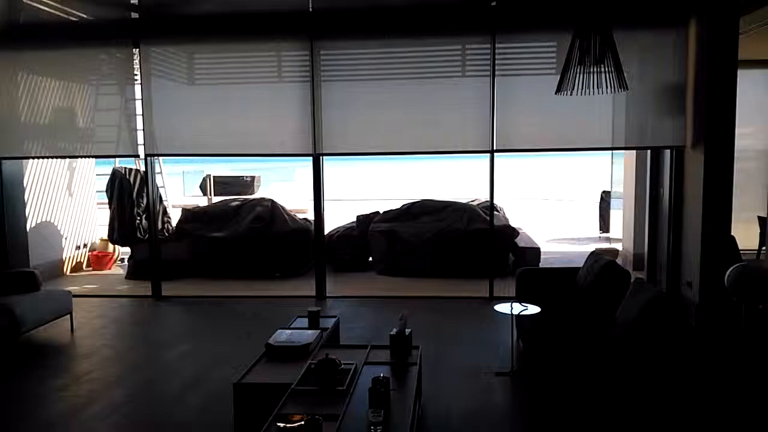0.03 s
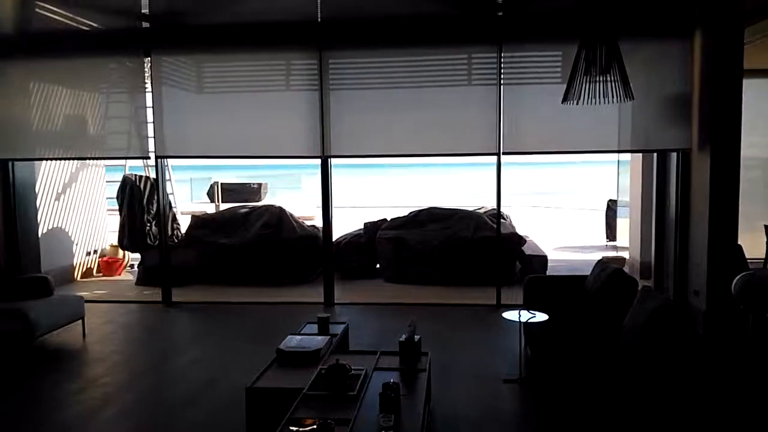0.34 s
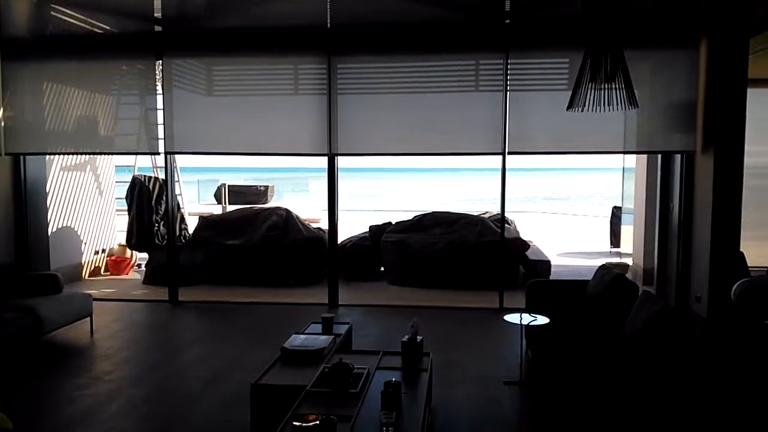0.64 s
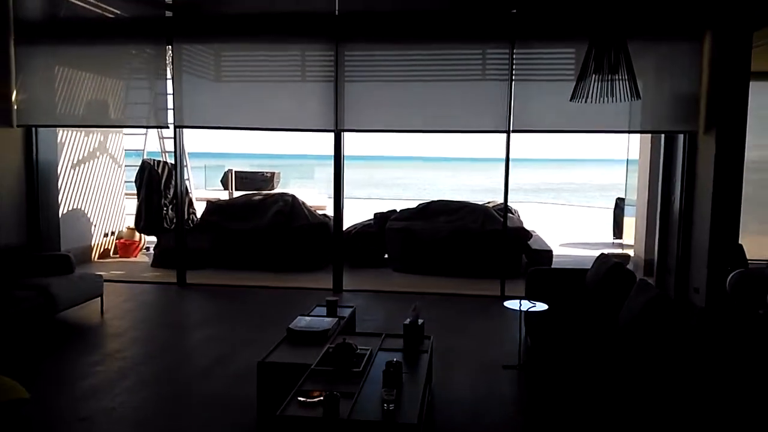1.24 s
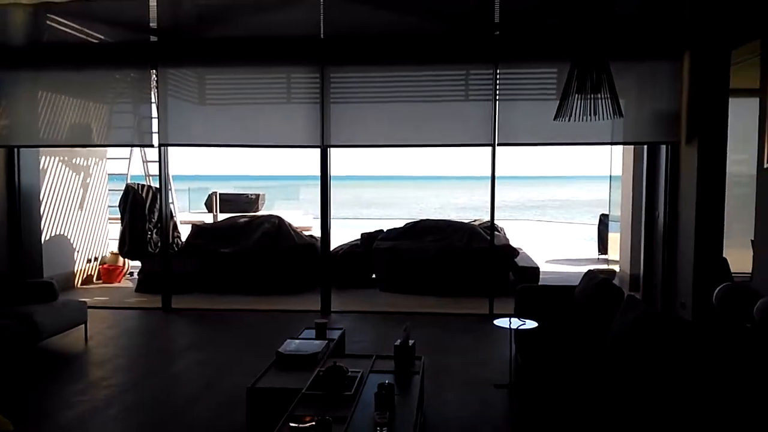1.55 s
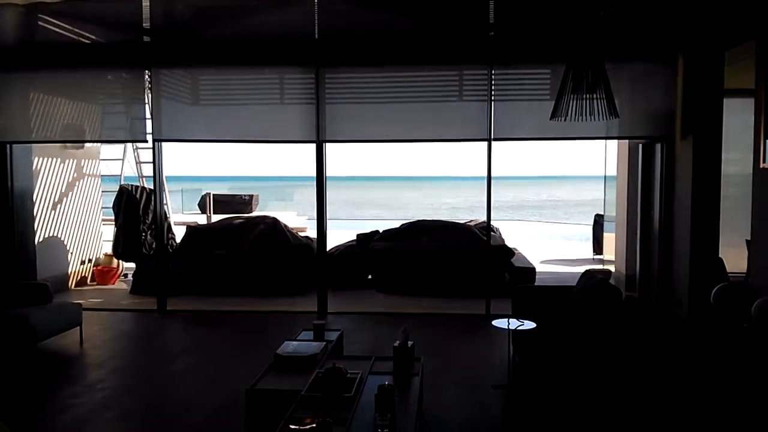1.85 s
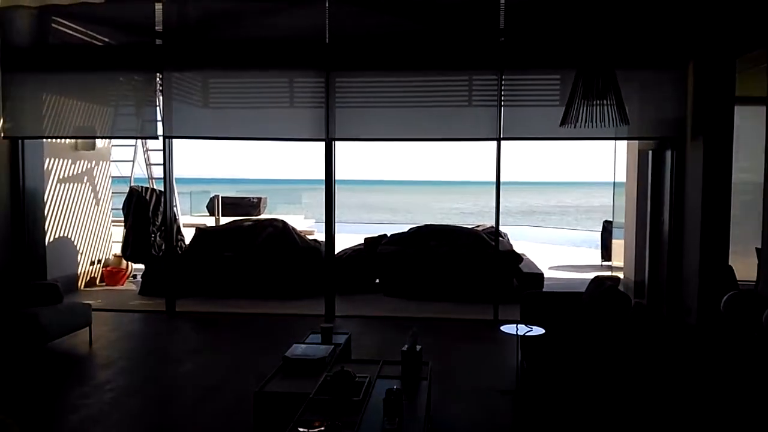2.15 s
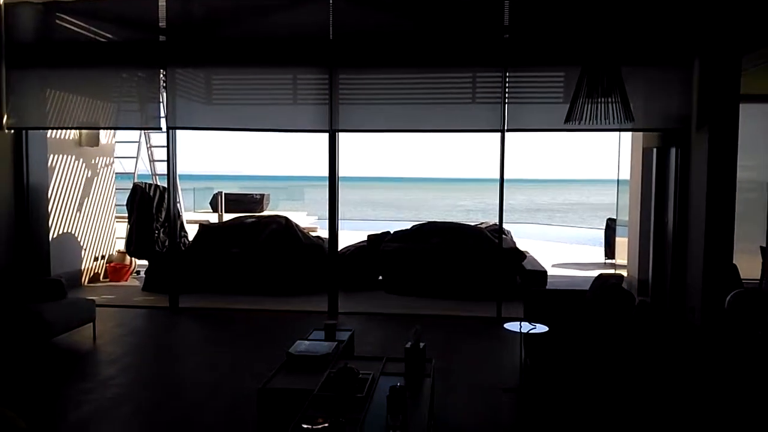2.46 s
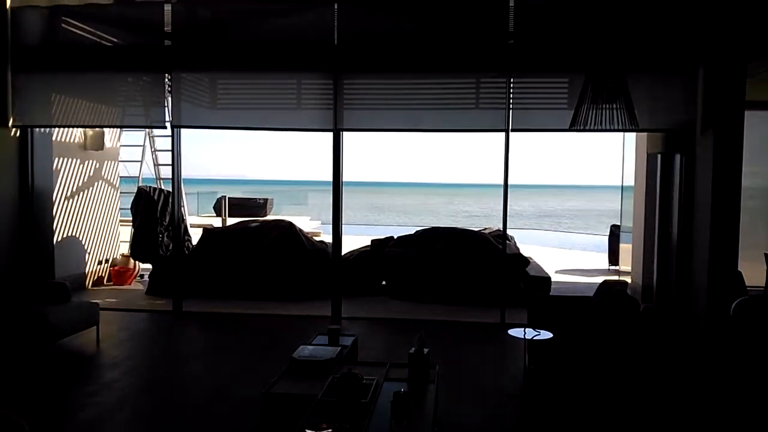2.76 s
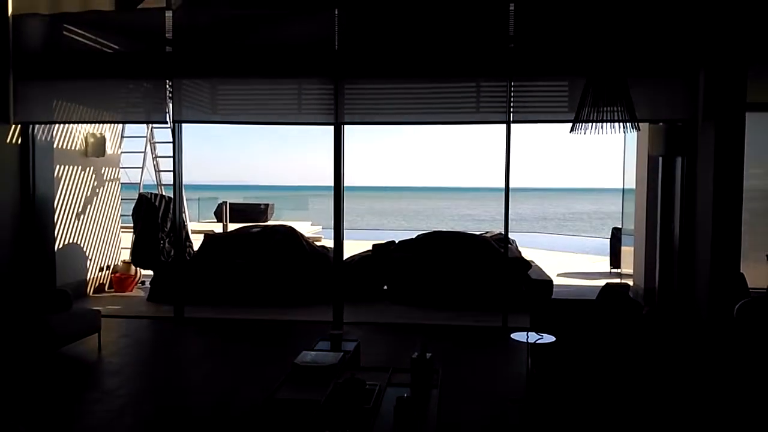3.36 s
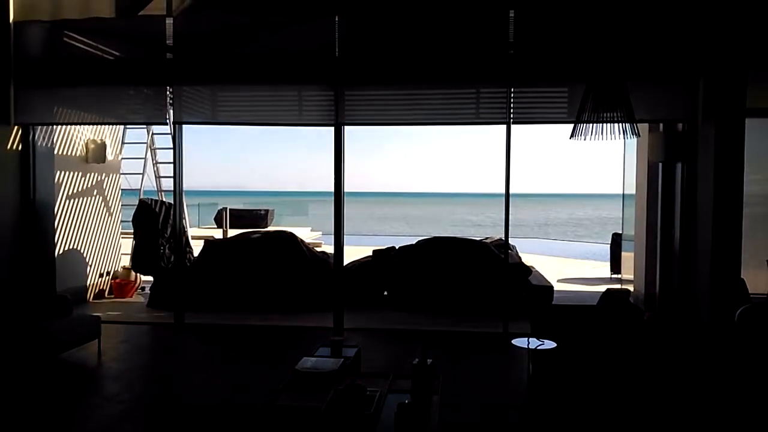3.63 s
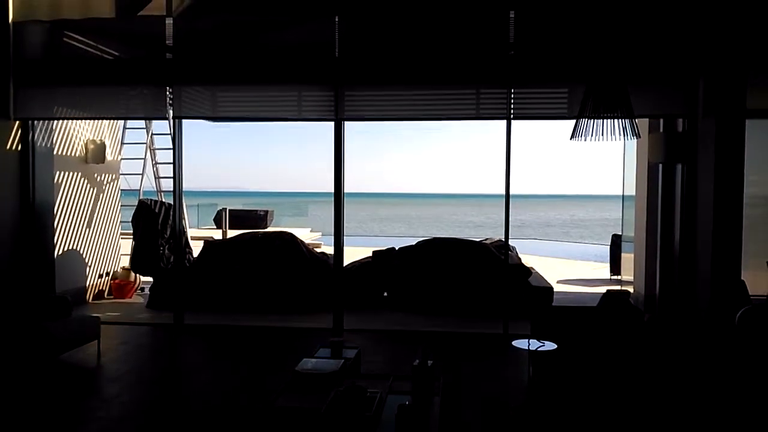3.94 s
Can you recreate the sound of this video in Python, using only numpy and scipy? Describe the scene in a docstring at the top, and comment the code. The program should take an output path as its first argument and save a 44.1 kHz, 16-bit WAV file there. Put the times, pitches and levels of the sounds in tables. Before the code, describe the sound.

Motorized blinds roll up with a low, pulsing hum and a light gear whirr.

```python
"""A quiet room, in which wide roller blinds are heard rising from across the floor.
Three tube motors run at nearly equal speeds, so their hums superpose in slow beats over a low throb.
The turning rollers rumble, the casing rings at its resonances, and the gears whirr and whine,
loudest in about the first second. The fabric rustles faintly and the mechanism ticks once."""
import sys
import numpy as np
from scipy import signal
from scipy.fft import rfft, irfft
from scipy.io import wavfile
from scipy.ndimage import uniform_filter1d

SR = 44100
rng = np.random.default_rng(int(sys.argv[2]) if len(sys.argv) > 2 else 0)


def output_pcm(signal):
    """Save a mono or channel-first signal as 16-bit PCM at the path in sys.argv[1].

    Samples are clipped to [-1, 1] before scaling.
    """
    pcm = np.clip(np.atleast_2d(signal).T, -1, 1) * 32767
    wavfile.write(sys.argv[1], SR, np.round(pcm).astype(np.int16))


N = 176400
T = np.arange(N) / SR

# Levels are relative. A spectrum gives only the shape of a noise; balance is left minus right.
# hums of the three motors (offset from the middle motor f/Hz, level/dB)
MOTOR_HUMS = [(0, -41), (-1.676, -47), (1.73, -60.5)]
# level of the hum, with deep dips where the beats fall nearly silent (t/s, level/dB)
HUM_ENVELOPE = [(.11, -12), (.25, 2.5), (.44, 3), (.6, 0.5), (.69, 0.5), (.8, 1), (1.2, 3), (1.4, -2),
                (1.58, -2), (1.8, -6), (1.88, -22.5), (1.96, 1), (2.1, -5), (2.26, -0.5), (2.55, -2.5),
                (2.85, 0), (3.05, -12), (3.17, -3), (3.3, -2.5), (3.5, 4.5), (3.7, 2.5), (4, 1.5)]
# envelope of the throb and the drive's drone (t/s, level/dB)
THROB_ENVELOPE = [(.11, -11), (.33, 5), (.45, -3.5), (.6, 3), (.85, -1.5), (1.15, 5.5), (1.28, -4),
                  (1.42, 2), (1.78, 0.5), (1.88, -11), (1.98, 4), (2.38, -5.5), (2.55, -2.5), (2.8, 2.5),
                  (3.1, -7), (3.38, 2.5), (3.68, 0), (3.92, 1.5)]
# throb of the motor mounts (f/Hz, level/dB)
THROB_SPECTRUM = [(20, -22), (35, -26.5), (45, 6), (57, 2.5), (70, 4.5), (80, 11.5), (92, 0), (115, -17),
                  (200, -51)]
# envelope of the roller rumble (t/s, level/dB)
RUMBLE_ENVELOPE = [(.12, -66.5), (.23, -56), (.38, -46.5), (.56, -47.5), (.68, -44), (.82, -47.5),
                   (1.08, -45.5), (1.2, -45), (1.45, -59.5), (1.8, -56.5), (2.05, -51.5), (2.3, -50.5),
                   (2.45, -56), (2.8, -52), (3.18, -51.5), (3.5, -46), (3.8, -46), (4, -57)]
# roller rumble (f/Hz, level/dB)
RUMBLE_SPECTRUM = [(40, -49), (85, -27), (112, 5.5), (137, 3), (165, 4), (185, -2.5), (212, -4.5),
                   (250, -11), (330, -28), (700, -83.5)]
# envelope of the casing's drone and ringing (t/s, level/dB)
CASING_ENVELOPE = [(.12, -68.5), (.22, -54.5), (.42, -48), (1.2, -48.5), (1.48, -58.5), (1.75, -58),
                   (2.2, -56), (2.6, -57.5), (3.1, -55), (3.4, -54.5), (3.6, -56.5), (3.85, -53), (4, -53)]
# drone of the casing (f/Hz, level/dB)
CASING_SPECTRUM = [(150, -16.5), (250, 0), (300, -0.5), (340, -3.5), (400, 3), (450, -4.5), (500, -3),
                   (580, -3), (680, -8.5), (800, -10.5), (1100, -26.5), (2000, -60)]
# resonances of the casing (f/Hz, bandwidth/Hz, level/dB, balance/dB)
CASING_MODES = [(200.8, 13.5, -6.5, -4.5), (274.6, 11, -18.5, -2), (301.2, 4.5, -14.5, 1.5),
                (424, 10, -12, 3), (476.4, 8.8, -13.5, -2.5), (522, 6, -18, -1.5), (585.6, 14, -19.5, -1),
                (745, 6.9, -19, 4.5), (808, 8, -28, -4.5)]
# hollow swells of the casing (centre t/s, duration/s, level/dB)
HOLLOW_SWELLS = [(0.435, .14, -54.5), (0.96, 0.51, -58.5), (1.627, 0.089, -62.5), (2.31, 0.13, -62.5),
                 (3.366, 0.13, -57.5), (3.81, 0.29, -58)]
# timbre of those swells (f/Hz, level/dB)
HOLLOW_SPECTRUM = [(200, -27.5), (270, 3.5), (330, -1.5), (395, 8.5), (430, 5), (500, -9), (700, -40)]
# envelope of the gear noise (t/s, level/dB)
GEAR_ENVELOPE = [(.12, -75), (.2, -64), (.38, -56), (1.0, -56), (1.24, -55.5), (1.46, -67), (1.9, -69),
                 (2.05, -68), (2.35, -70.5), (2.86, -67), (3.15, -69), (3.3, -66.5), (4, -65)]
# gear whirr (f/Hz, level/dB)
WHIRR_SPECTRUM = [(100, -16.5), (400, 1.5), (750, -6.5), (950, -1.5), (1350, -2.5), (1650, 1), (2000, -0.5),
                  (2350, 1.5), (2800, -2), (3150, -13), (3900, -16), (4150, -15), (4400, -9), (4750, -18.5),
                  (5500, -23), (6500, -29.5), (9000, -41), (15000, -50.5)]
# gear whines (f/Hz, bandwidth/Hz, level/dB, balance/dB)
GEAR_WHINES = [(1515, 7, -15.5, 6), (1664, 10, -19, 2), (1803, 8, -16, 0), (2181, 8, -19, 6),
               (2385, 14, -21, 4), (2466, 8, -18.5, 9), (2766, 12, -20, 10), (4305, 14, -28, -4)]
# bright rasp heard while the whirr is loud (f/Hz, level/dB)
RASP_SPECTRUM = [(700, -10.5), (1150, 9), (1600, -6), (2700, -6.5), (3200, 0), (3900, -2), (4450, 1),
                 (4900, -1), (5500, -8), (6600, -18.5), (10000, -34.5)]
# rustles of the fabric (onset t/s, duration/s, level/dB)
RUSTLE_EVENTS = [(.41, .08, -84), (.66, .04, -85), (1.41, .07, -83), (2.51, .22, -86), (2.75, .1, -86),
                 (3.77, .05, -83), (3.935, .03, -81)]
# timbre of a rustle (f/Hz, level/dB)
RUSTLE_SPECTRUM = [(1500, -10), (4500, 0), (8000, 0), (11000, -4), (15000, -12)]
# tick of the mechanism (t/s, level/dB)
TICK_EVENTS = [(1.072, -43.5)]
# timbre of the tick (f/Hz, level/dB)
TICK_SPECTRUM = [(500, -16), (1000, -5.5), (1500, 5), (2000, -19), (3000, -18), (8000, -50)]
# likeness of the two microphone signals (f/Hz, correlation before clipping to -1..1)
CORRELATION = [(30, 0.6), (100, 1.6), (200, 1.27), (350, 0.82), (550, 0.72), (850, 0.48), (1300, -0.11),
               (1800, -0.1), (2600, 0.13), (4000, -0.01), (8000, -0.08), (15000, -0.5)]
# level difference between the microphones (f/Hz, balance/dB)
BALANCE = [(30, 2), (150, 3), (450, -1.5), (750, 1), (1200, 0), (1900, 2.5), (2350, 6), (2800, 9.5),
           (3300, -2), (3800, -2), (4400, -2), (5200, -8), (7000, -1), (12000, 0.5)]
# microphone hiss (f/Hz, level/dB)
HISS_SPECTRUM = [(100, 0.5), (3000, -5.5), (7000, 3), (10000, 1.5), (15500, -2.5)]
# thin electrical whistles (f/Hz, level/dB)
WHISTLE_TONES = [(7381, -102), (14729, -102)]


def amp(db):
    """Amplitude ratio: a factor of ten for every 20 dB."""
    return 10 ** (np.asarray(db) / 20)


def unit(x):
    """Normalisation to an rms of 1."""
    return x / np.sqrt(np.mean(abs(x) ** 2) + 1e-30)


def at_hz(points, hz):
    """Interpolation on a logarithmic frequency axis."""
    f, value = np.transpose(points)
    return np.interp(np.log(hz + 1), np.log(f), value)


def envelope(points):
    """Amplitude envelope, piecewise linear in decibels."""
    return amp(np.interp(T, *np.transpose(points)))


def pan(balance_db):
    """Constant-power law for the left and right gains."""
    gains = amp(np.array([balance_db / 2, -balance_db / 2]))
    return (gains / np.sqrt((gains ** 2).sum(0) / 2))[:, None]


def wander(rate_hz):
    """Random modulation: complex noise low-passed at the given rate."""
    f = np.fft.fftfreq(N, 1 / SR)
    real, imag = rng.standard_normal((2, N))
    return unit(np.fft.ifft((real + 1j * imag) / (1 + (f / rate_hz) ** 4)))


def colour(x, spectrum):
    """Filtering by multiplication in the frequency domain, at unit rms."""
    gain = amp(at_hz(spectrum, np.fft.rfftfreq(N, 1 / SR)))
    return unit(irfft(rfft(x) * gain, N))


def stereo_pair(left, independent, hz):
    """Partial coherence: the right microphone shares part of the left one's signal."""
    shared = np.clip(at_hz(CORRELATION, hz), -1, 1)
    return np.array([left, shared * left + np.sqrt(1 - shared ** 2) * independent])


def diffuse_noise(spectrum, patchy_db, frame=2048):
    """Diffuse field: partly coherent noise whose level drifts in patches of time and frequency."""
    hz = np.fft.rfftfreq(frame, 1 / SR)
    a, b, c, d, patches = rng.standard_normal((5, 4 * N // frame + 5, len(hz)))
    patches = uniform_filter1d(patches, size=6, axis=0)
    patches = unit(uniform_filter1d(patches, size=3, axis=1))
    pair = stereo_pair(a + 1j * b, c + 1j * d, hz)
    spectra = pair * amp(at_hz(spectrum, hz) + patchy_db * patches) * pan(at_hz(BALANCE, hz))
    _, noise = signal.istft(spectra.transpose(0, 2, 1), nperseg=frame, noverlap=frame - frame // 4)
    return unit(noise[:, :N])


def ringing(modes):
    """Randomly excited resonances: each is a narrow band that wavers in level and pitch."""
    total = np.zeros((2, N))
    for hz, width_hz, db, balance_db in modes:
        drift = stereo_pair(wander(width_hz / 2), wander(width_hz / 2), hz)
        total += amp(db) * pan(balance_db) * unit((drift * np.exp(2j * np.pi * hz * T)).real)
    return total


def motors(middle_hz=101.33, in_phase_s=0.45, octave_db=-26.5):
    """Beats: three hums of nearly equal frequency alternately reinforce and oppose one another."""
    hum = np.zeros(N, complex)
    for offset_hz, db in MOTOR_HUMS:
        phasor = np.exp(2j * np.pi * (middle_hz + offset_hz) * (T - in_phase_s))
        hum += amp(db) * (phasor + amp(octave_db) * phasor ** 2)
    hum *= 1 + 0.17 * wander(rate_hz=8.1)  # flutter
    return envelope(HUM_ENVELOPE) * np.sqrt(2) * hum.real * pan(balance_db=-1.4)


def drive(drone_hz=74.03):
    """Amplitude modulation: the drive's low drone and the mounts' throb swell and sink together."""
    drone = amp(-54.5) * unit(np.sin(2 * np.pi * drone_hz * T))
    throb = amp(-56) * diffuse_noise(THROB_SPECTRUM, patchy_db=1, frame=8192)
    return envelope(THROB_ENVELOPE) * (drone + throb)


def rollers():
    """Random vibration: the turning tubes radiate an uneven low rumble."""
    rumble = amp(-0.5) * diffuse_noise(RUMBLE_SPECTRUM, patchy_db=1, frame=4096)
    return envelope(RUMBLE_ENVELOPE) * rumble


def casing():
    """Resonance: the housing drones, rings at its natural frequencies and at times swells hollowly."""
    drone = amp(-3.5) * diffuse_noise(CASING_SPECTRUM, patchy_db=2)
    modes = ringing(CASING_MODES)
    swell = sum(amp(db) * np.exp(-2 * ((T - centre) / length) ** 2)
                for centre, length, db in HOLLOW_SWELLS)
    hollow = swell * diffuse_noise(HOLLOW_SPECTRUM, patchy_db=2)
    return envelope(CASING_ENVELOPE) * (drone + modes) + hollow


def gears(rasp_exponent=1.8):
    """Meshing noise: the teeth whirr and whine; the rasp grows as a power of the whirr's level."""
    whirr_level = envelope(GEAR_ENVELOPE)
    rasp_gain = amp(-64.5) * (whirr_level / whirr_level.max()) ** rasp_exponent
    rasp = rasp_gain * diffuse_noise(RASP_SPECTRUM, patchy_db=1.4)
    whirr = amp(3.5) * diffuse_noise(WHIRR_SPECTRUM, patchy_db=1.4)
    return whirr_level * (whirr + ringing(GEAR_WHINES)) + rasp


def fabric(grain_db=6):
    """Modulated noise: the cloth gives short, grainy rustles as it winds on."""
    bursts = sum(amp(db) * np.sin(np.pi * np.clip((T - onset) / length, 0, 1))
                 for onset, length, db in RUSTLE_EVENTS)
    grains = np.tanh(unit(uniform_filter1d(rng.standard_normal(N), size=90)))
    grainy_noise = rng.standard_normal((2, N)) * amp(grain_db * grains)
    return bursts * colour(grainy_noise, RUSTLE_SPECTRUM)


def tick(t60_s=0.035):
    """Damping: a dull tick of the mechanism decays exponentially."""
    decay = sum((T >= onset) * amp(db - 60 * np.maximum(T - onset, 0) / t60_s)
                for onset, db in TICK_EVENTS)
    softened = uniform_filter1d(decay, size=60)
    return softened * colour(rng.standard_normal(N), TICK_SPECTRUM)


def scene():
    """Superposition: the sound pressures of all the sources add."""
    return motors() + drive() + rollers() + casing() + gears() + fabric() + tick()


def record(dry, start_s=0.11, fade_s=0.014, floor_fade_s=0.34, cutoff_hz=15750):
    """Noise floor and bandwidth: hiss and whistles join the sound, which fades in and is low-passed."""
    floor = amp(-82.5) * colour(rng.standard_normal((2, N)), HISS_SPECTRUM)
    floor += sum(amp(db) * unit(np.sin(2 * np.pi * hz * T)) for hz, db in WHISTLE_TONES)
    floor *= np.clip((T - start_s) / floor_fade_s, 0, 1)
    heard = (dry + floor) * np.clip((T - start_s) / fade_s, 0, 1)
    lowpass = signal.firwin(511, cutoff_hz, window=("kaiser", 9), fs=SR)
    return signal.oaconvolve(heard, lowpass[None], "same")


dry = scene()
out = record(dry)
output_pcm(out)
```